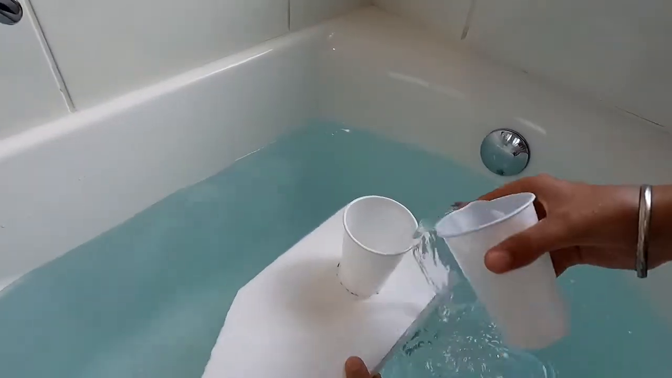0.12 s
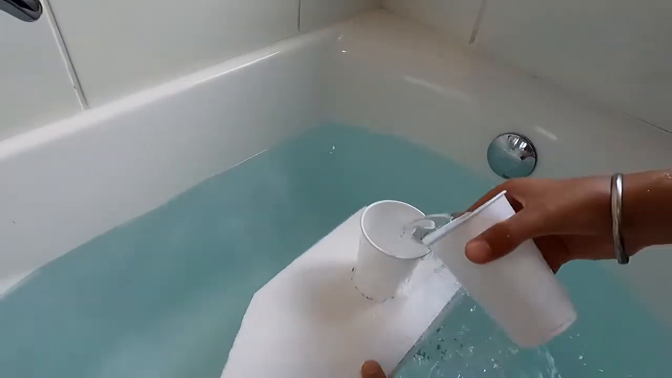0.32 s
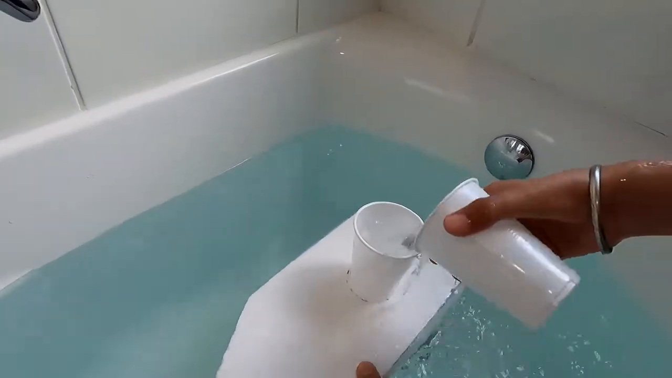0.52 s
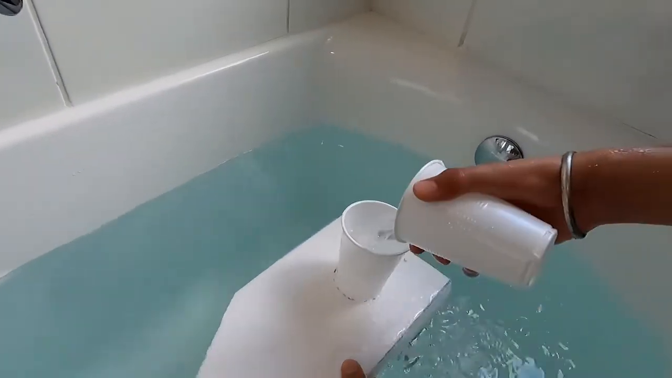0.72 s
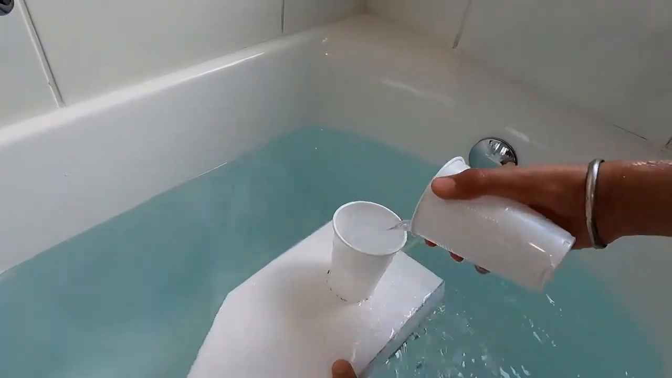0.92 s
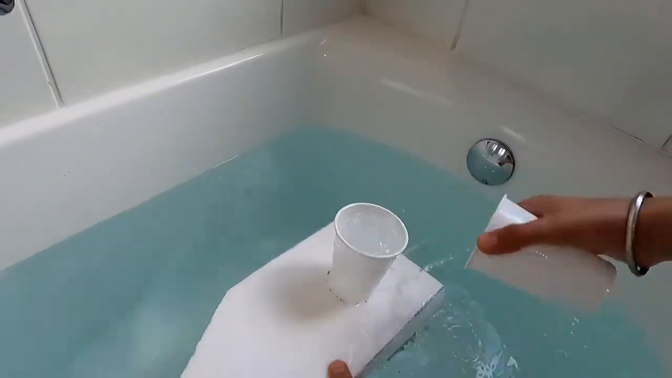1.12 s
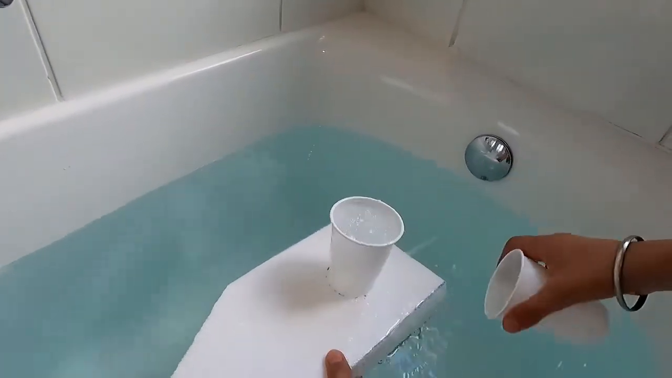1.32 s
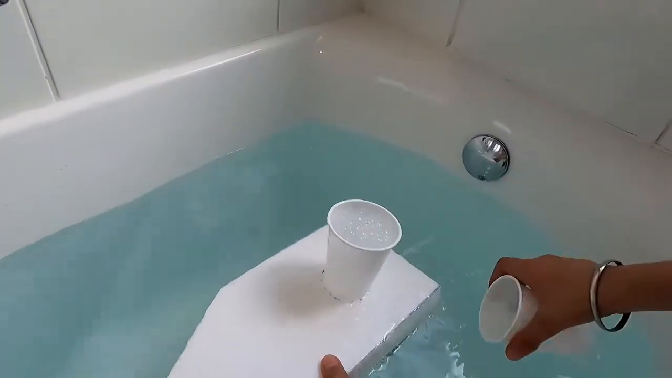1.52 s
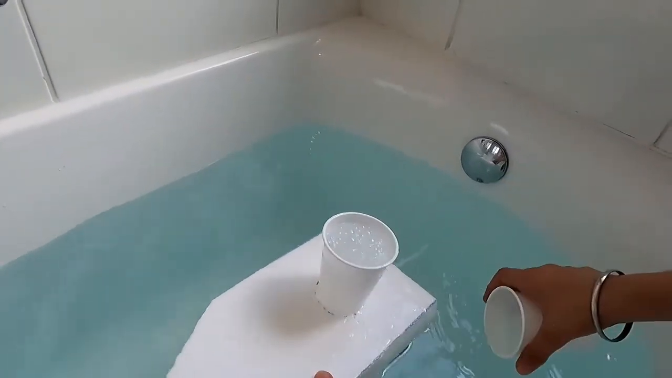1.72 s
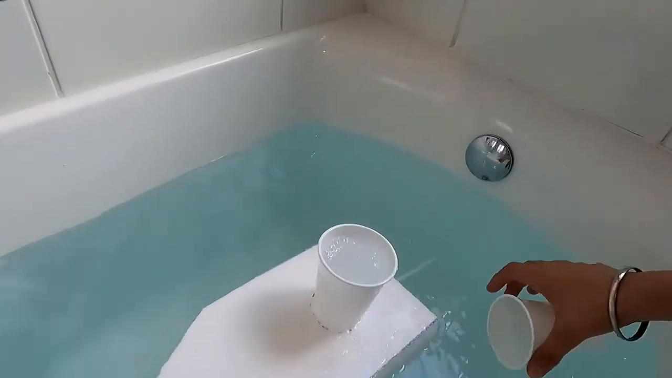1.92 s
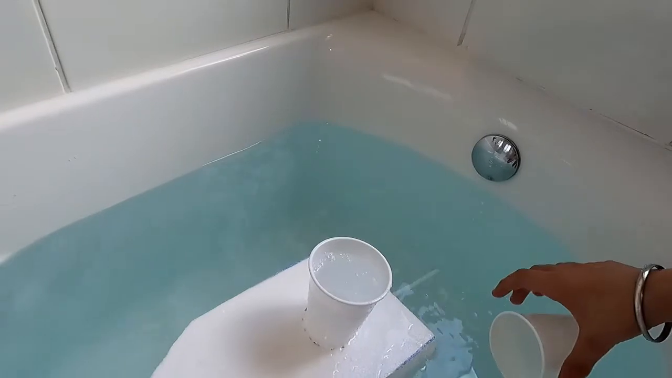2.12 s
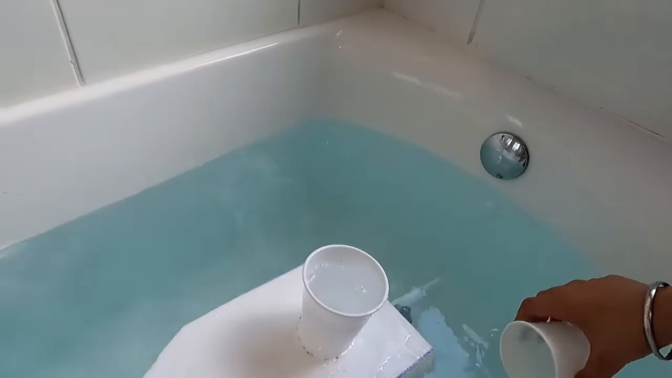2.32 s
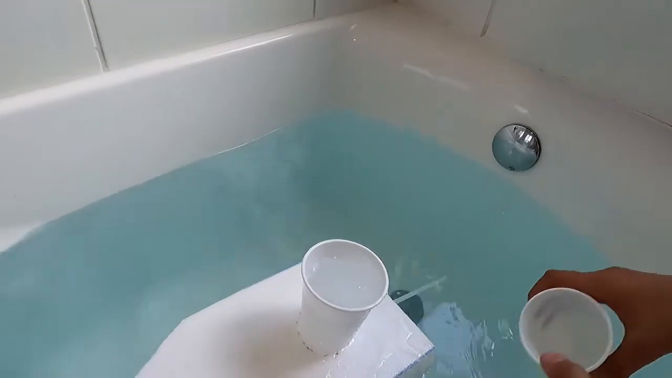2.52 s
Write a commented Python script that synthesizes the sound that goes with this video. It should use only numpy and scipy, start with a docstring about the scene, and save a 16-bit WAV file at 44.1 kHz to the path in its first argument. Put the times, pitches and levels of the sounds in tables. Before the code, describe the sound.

Short splashy water pour with bright plinks and a rising gurgle, fading to drips in a bathroom

```python
"""In a tiled bathroom, water is tipped from a plastic cup into a second cup that floats in a bathtub,
and spills over into the bath. The pour starts with a loud plink, gurgles upward as the cup fills,
then thins to drips and soft lapping. Ringing bubbles make the plinks and the gurgle; shaped noise adds
wash and hiss. The tub walls answer at once and the room rings on."""
import sys
import numpy as np
from scipy import signal
from scipy.fft import rfft, irfft, next_fast_len
from scipy.io import wavfile
from scipy.ndimage import map_coordinates

SR = 44100
rng = np.random.default_rng(int(sys.argv[2]) if len(sys.argv) > 2 else 0)


def wav_out(sig):
    """Save sig, one row per channel (or a flat mono array), as 16-bit PCM at SR to the path in sys.argv[1]."""
    wavfile.write(sys.argv[1], SR, np.round(np.clip(np.atleast_2d(sig).T, -1, 1) * 32767).astype(np.int16))


N = 114660  # length in samples (2.6 s)
TOP_HZ = 15900  # nothing sounds above this


def amp(db):
    """Turn decibels into a gain."""
    return 10 ** (np.asarray(db) / 20)


def unit(x):
    """Scale to an average (rms) strength of 1."""
    return x / np.sqrt(np.mean(x ** 2) + 1e-20)


def along(points, hz):
    """Read a curve of (Hz, value) points, with pitch on a log axis."""
    f, v = np.transpose(points)
    return np.interp(np.log(hz + 1), np.log(f + 1), v)


def curves(rows):
    """Draw each column after the time as a curve with one value per sample."""
    s, *columns = np.transpose(rows)
    return [np.interp(np.arange(N) / SR, s, column) for column in columns]


def filtered(x, response):
    """Strengthen or weaken each frequency of x by a response."""
    m = next_fast_len(N + SR // 2)
    return irfft(rfft(x, m) * response(np.fft.rfftfreq(m, 1 / SR)), m)[..., :N]


def coloured(x, colour):
    """Filter x by a colour curve, then scale to rms 1."""
    return unit(filtered(x, lambda hz: amp(along(colour, hz))))


def noise(alike, size=N):
    """Stereo white noise; alike is the likeness of left and right, 1 for the same."""
    a, b = rng.standard_normal((2, size))
    u = np.arccos(np.clip(alike, -1, 1)) / 2
    left = np.cos(u) * a + np.sin(u) * b
    right = np.cos(u) * a - np.sin(u) * b
    return np.array([left, right])


BAND_ALIKE = 0.55  # left-right likeness


def band(centre_hz, width):
    """Stereo noise in one resonance, at rms 1; width is a share of the centre pitch."""
    return unit(filtered(noise(BAND_ALIKE), lambda hz: 1 / (1 + ((hz / centre_hz - 1) / width) ** 2)))


def wobble(rate):
    """A smooth random curve through rate random points a second."""
    points = rng.standard_normal(int(N * rate / SR) + 4)
    return map_coordinates(points, [np.arange(N) * rate / SR])


def add(track, s, sound):
    """Mix a sound into a track at a time in seconds."""
    i = max(0, round(s * SR))
    part = track[..., i:i + sound.shape[-1]]
    part += sound[..., :part.shape[-1]]


SOFT_CYCLES = 0.87  # swell time of a bubble, in cycles


def ring(t, hz, life, rise):
    """A bubble: a dying sine whose pitch glides by the share rise in each life (life in seconds)."""
    glide = 1 + rise * np.minimum(t / life, 6) / 2
    swell = 1 - np.exp(-(t * hz / SOFT_CYCLES) ** 2)
    return np.sin(2 * np.pi * hz * t * glide) * np.exp(-t / life) * swell


SWARM_RISE = 0.031  # pitch rise per life
WIDTH, WIDE_ABOVE_HZ = 0.56, 300  # small bubbles scatter widely; the large ones stay near the middle


def swarm(rate, centre_hz, spread, cycles, scatter_db, size):
    """Random bubbles, rate a second, scattered in pitch, strength and direction; stereo, rms 1."""
    count = int(rate * N / SR)
    u = rng.random((count, 5))
    start = (u[:, 0] * N).astype(int)
    pitch_scatter = np.exp(spread * np.log(u[:, 1] / (1 - u[:, 1])) / 2)
    hz = np.broadcast_to(centre_hz, N)[start] * pitch_scatter
    hz = np.clip(hz, 100, TOP_HZ)[:, None]
    life = cycles * (.5 + u[:, 2:3]) / hz  # half to one and a half times the given cycles
    waves = ring(np.arange(size) / SR, hz, life, SWARM_RISE)
    waves = waves * amp(scatter_db * np.minimum(-np.log(u[:, 3:4]), np.e))
    pan = WIDTH * hz / np.hypot(hz, WIDE_ABOVE_HZ) * (2 * u[:, 4:] - 1)
    at = (start[:, None] + np.arange(size)).ravel()
    sides = [np.bincount(at, (waves * (1 + side * pan)).ravel(), N)[:N] for side in (1, -1)]
    return unit(np.array(sides))


def plink(t, hz, life, rise):
    """One bubble's ring; it radiates next to nothing far below its pitch."""
    highpass = signal.butter(3, hz / 2, "highpass", fs=SR, output="sos")
    return signal.sosfilt(highpass, ring(t, hz, life, rise))


def spattered(sound, level_db, life):
    """A sound followed by a dying cluster of weak random repeats."""
    t = np.arange(SR // 30) / SR
    fade = np.exp(-t / life) * (1 - np.exp(-t * 10 / life))
    hits = amp(level_db) * rng.standard_normal(len(t)) * fade
    return np.pad(sound, (0, len(t) - 1)) + signal.fftconvolve(sound, hits)


# Single air bubbles that ring as drops and the stream plunge in. Each row: start in seconds,
# starting pitch in Hz, level in dB, life in cycles, pitch rise per life as a share.
PLUNGE_BUBBLES = [(.1155, 1704, -32, 13, 0.018), (.1170, 1651, -46.5, 260, -0.0097),
                  (0.2261, 1954, -4.5, 7.6, 0.069), (.2385, 1163, -22, 8.2, -0.055),
                  (.2690, 828, -30, 11, -0.034), (.3600, 1048, -22.5, 3.8, -0.046),
                  (0.363, 244, -41, 4, 0.016), (0.387, 473, -40.5, 3.2, 0.024),
                  (.3830, 1036, -26, 9.2, -0.011), (.4640, 1710, -20, 10.5, -0.048),
                  (.4660, 1047, -30, 21, -0.0035), (.4760, 336, -40, 5.7, .03), (0.483, 251, -42, 5.7, .03),
                  (.5480, 1306, -26, 22, 0.0052), (.5640, 1460, -22, 4, 0), (.5830, 1235, -22, 29, 0.0174),
                  (.6040, 1294, -24, 9.9, 0.018), (.6115, 2830, -15, 2, -0.018),
                  (.6450, 2170, -22, 10, .02), (.6503, 1244, -15.5, 5, -0.004),
                  (.6553, 1384, -8.5, 2.8, -0.005), (.6930, 1327, -22, 9.6, 0.012),
                  (.7033, 2300, -16, 3.2, 0.06), (.7100, 1450, -23, 2.4, 0.058),
                  (.7290, 1308, -20, 14.6, -0.029), (.7500, 1653, -21, 11.8, 0.0076),
                  (.7680, 1610, -32, 8, 0.033), (.7850, 1350, -26.5, 9.5, -0.0034),
                  (.9650, 883, -26, 3.2, 0.025), (.9680, 434, -46.5, 5.8, 0.054),
                  (.9700, 4200, -22, 11.4, 0.022), (1.0800, 1300, -28, 5.5, 0.0014),
                  (1.1100, 2370, -30, 11, 0), (1.1460, 855, -29, 1.9, 0.037),
                  (1.1550, 390, -31.5, 2.2, -0.0036), (1.1612, 2420, -20.5, 3.9, 0.055),
                  (1.2580, 1970, -21, 2.4, 0.033), (1.4264, 1920, -9, 2.18, 0.019),
                  (1.4285, 2668, -18.5, 4.9, 0.014), (1.4439, 2230, -11.5, 2.4, 0.0071),
                  (1.5455, 1185, -29.5, 2.2, 0.016), (1.6200, 888, -42, 5.5, 0.028),
                  (1.7738, 1840, -24, 2.7, 0.014), (1.8320, 4820, -48.5, 37, 0.014),
                  (1.8720, 4240, -43.5, 15, -0.034), (2.2950, 2370, -55, 9, .02),
                  (2.3560, 1086, -44, 2.8, .02), (2.3580, 560, -52, 3, 0.013)]
# Sharp ticks of drops hitting water and plastic. Each row: start in seconds, pitch in Hz, level in dB.
DROP_TICKS = [(0.1337, 3870, -19.5), (0.1547, 4320, -24), (0.19, 4500, -20.5), (.2079, 5100, -14.5),
              (0.211, 3550, -25), (0.215, 5340, -17), (.218, 6100, -23.5), (0.225, 3320, -5),
              (0.2909, 4670, -11), (.2965, 6200, -27), (.3324, 4750, -27), (.3635, 7060, -26),
              (0.3771, 5000, -16.5), (.385, 4770, -15), (0.3976, 4020, -11.5), (0.4024, 5300, -17.5),
              (0.461, 6800, -25), (0.4912, 3560, -8), (0.5464, 5720, -15), (.5660, 3960, -13.5),
              (0.587, 5400, -21), (0.598, 7900, -22), (0.6496, 4870, -19), (0.6683, 3280, -10),
              (0.7033, 3280, -19), (0.7287, 4000, -17), (0.7330, 4730, -14.5), (.85, 3240, -18.5),
              (0.8952, 3800, -18.5), (0.9657, 3270, -13.5), (0.971, 3660, -19), (0.9957, 4300, -27),
              (1.0110, 3430, -18.5), (1.0677, 6940, -25), (1.1611, 4800, -19), (1.1785, 3470, -30),
              (1.215, 3340, -26), (1.2578, 2535, -22), (1.33, 4570, -20.5), (1.3857, 3060, -19),
              (1.3875, 4260, -22), (1.5357, 8670, -30), (1.5460, 3100, -18.5), (1.774, 8140, -42),
              (1.7905, 5000, -24), (1.8182, 3930, -37), (1.8974, 4030, -35), (1.953, 4760, -25),
              (1.9950, 5000, -37.5), (2.3570, 5980, -44), (2.4308, 7720, -42.5)]
# Bright snaps where a drop strikes flat. Each row: start in seconds, level in dB.
FLAT_SNAPS = [(0.1341, -37.5), (0.156, -37.5), (.2470, -32), (0.4627, -31), (0.492, -28), (0.5483, -32),
              (0.7299, -26.5), (1.0653, -48), (1.1000, -38), (1.444, -42.5), (1.5351, -42.5), (1.5460, -43),
              (1.7743, -38.5), (1.7928, -47.5), (1.9521, -47.5)]
# The tone of a snap. Each row: frequency in Hz, gain in dB.
SNAP_COLOUR = [(400, -50), (1500, -22), (3000, 3.5), (6000, 8.5), (9000, 1.5), (12000, -7), (15500, -22.5)]
SPLASH_DB, SPLASH_S = -24.5, 0.0068  # splash that roughens a one-cycle bubble (less on longer ones); its life
TICK_LIFE_S, TICK_RISE = 0.00052, 0.021  # ring of a tick; pitch rise per life
SPATTER_DB, SPATTER_S = -20.5, 0.0042  # fine droplets thrown up after a tick; their life
SNAP_S = 0.0027  # life of a snap


def drops():
    """Large bubbles plink with a splash, hard drops tick and spatter, and the flattest hits snap."""
    out, snaps, t = np.zeros(N), np.zeros((2, N)), np.arange(SR // 8) / SR
    for s, hz, db, cycles, rise in PLUNGE_BUBBLES:
        bubble = plink(t, hz, cycles / hz, rise)
        add(out, s, amp(db) * spattered(bubble, SPLASH_DB - 10 * np.log10(cycles), SPLASH_S))
    for s, hz, db in DROP_TICKS:
        tick = plink(t, hz, TICK_LIFE_S, TICK_RISE)
        add(out, s, amp(db) * spattered(tick, SPATTER_DB, SPATTER_S))
    for s, db in FLAT_SNAPS:
        add(snaps, s, amp(db) * noise(0.74, size=len(t)) * np.exp(-t / SNAP_S))
    return out + filtered(snaps, lambda hz: amp(along(SNAP_COLOUR, hz)))


# The stream in the cup. Each row: time in seconds, level of the bubbles in dB, pitch of the gurgle in Hz.
CUP_STREAM = [(.22, -86, 957), (.27, -42.5, 980), (.47, -43.5, 1072), (.53, -37, 1324), (.60, -42, 1284),
              (.77, -42.5, 1354), (.83, -50, 1442), (1.1, -57, 1422), (1.3, -99, 1410)]
GURGLE_RATE, GURGLE_CYCLES, GURGLE_WIDTH = 170, 6, 0.138  # bubbles a second; typical life; pitch spread
CUP_AIR_DB, CUP_AIR_RATE = -10, 42  # level of the air's note against the bubbles; how fast it wavers (per s)


def gurgle():
    """The bubbles and the air in the cup sound higher as it fills."""
    level_db, pitch_hz = curves(CUP_STREAM)
    phase = 2 * np.pi * np.cumsum(pitch_hz) / SR
    air = unit(wobble(CUP_AIR_RATE) * np.sin(phase) + wobble(CUP_AIR_RATE) * np.cos(phase))
    bubbles = swarm(GURGLE_RATE, pitch_hz, GURGLE_WIDTH, GURGLE_CYCLES, scatter_db=3.0, size=1600)
    return amp(level_db) * (bubbles + amp(CUP_AIR_DB) * air)


# Water spilling into the bath. Each row: time in seconds, level of the bubbles in dB.
SPILL_LEVEL = [(.22, -90), (.33, -62), (.37, -35), (.52, -42.5), (.66, -37.5), (.77, -34.5), (.82, -43),
               (.90, -40.5), (.95, -50), (.97, -41), (1.05, -47.5), (1.15, -45.5), (1.22, -58.5),
               (1.45, -68.5), (1.8, -64), (2.1, -87), (2.29, -73.5), (2.6, -79)]
# The tone of the spill. Each row: frequency in Hz, relative gain in dB.
SPILL_TONE = [(100, -32.5), (170, -14), (250, -9.5), (310, -18), (380, -6), (550, -15), (740, 0.5),
              (900, -8), (1400, -0.5), (1900, 1.5), (2500, 4), (4000, -9.5), (9000, -45)]
SPILL_WASH_DB = -7.5  # smooth wash against the bubbles


def spill(surge_db):
    """The overflow churns bubbles of all sizes into the bath."""
    level_db, = curves(SPILL_LEVEL)
    bubbles = swarm(1500, 1396, spread=.85, cycles=3.07, scatter_db=2.5, size=1200)
    wash = amp(SPILL_WASH_DB) * coloured(noise(1.0), SPILL_TONE)
    return amp(level_db + surge_db) * (coloured(bubbles, SPILL_TONE) + wash)


# The tone of the spray. Each row: frequency in Hz, relative gain in dB.
SPRAY_TONE = [(600, -31.5), (1800, -4.5), (3000, -5), (4300, -2.5), (6000, -5), (8000, -8), (10000, -19),
              (12500, -19.5), (15500, -34)]
# Fine spray and bursting foam, also followed by the pops. Each row: time in seconds, level in dB.
SPRAY_LEVEL = [(0, -53.5), (.11, -59.5), (.2, -47.5), (.25, -36.5), (.40, -37.5), (.52, -42.5), (.58, -38),
               (.74, -38.5), (.81, -47.5), (.95, -48), (1.0, -44), (1.05, -47.5), (1.09, -41),
               (1.14, -52.5), (1.25, -49), (1.4, -51.5), (1.48, -55), (1.7, -56.5), (1.87, -62),
               (2.15, -82.5), (2.3, -71.5), (2.38, -63.5), (2.6, -87)]
CLUMP_DB, CLUMP_RATE = 1.6, 160  # droplets land in clumps: depth; random points per second
PING_DB, SPRAY_HISS_DB = -3, -7.5  # pings against crackle; hiss against both


def spray(surge_db):
    """Tiny droplets crackle in clumps and tiny bubbles ping over a soft hiss."""
    level_db, = curves(SPRAY_LEVEL)
    droplets = swarm(1300, 5970, spread=.6, cycles=0.92, scatter_db=4.8, size=300)
    pings = swarm(420, 3800, spread=0.575, cycles=3.5, scatter_db=2.0, size=600)
    clumps = amp(CLUMP_DB * wobble(CLUMP_RATE))
    grains = unit(clumps * (droplets + amp(PING_DB) * pings))
    hiss = amp(SPRAY_HISS_DB) * coloured(noise(0.15), SPRAY_TONE)
    return amp(level_db + surge_db) * (coloured(grains, SPRAY_TONE) + hiss)


# The tone of the pops. Each row: frequency in Hz, relative gain in dB.
POP_TONE = [(1000, -42.5), (3000, -9), (5500, 1), (9000, -5.5), (12500, -1), (15500, -15.5)]
POP_DB, POP_FLOOR_DB = -13, -76  # level against the spray; steady level of the foam left on the bath


def pops():
    """Single tiny bubbles burst with needle-sharp pops, and go on after the pour."""
    level_db, = curves(SPRAY_LEVEL)
    grains = swarm(200, 7570, spread=0.41, cycles=1.05, scatter_db=5.0, size=200)
    return (amp(level_db + POP_DB) + amp(POP_FLOOR_DB)) * coloured(grains, POP_TONE)


# Ripples that slap under the float. Each row: start in seconds, pitch in Hz, level in dB.
RIPPLES = [(0.23, 71, -41), (1.653, 70.5, -39.5), (2.322, 199.6, -49.5), (2.356, 234.6, -40),
           (2.383, 150, -45), (2.428, 254, -48), (2.447, 274, -50), (2.458, 62, -52), (2.551, 52.5, -38),
           (2.581, 55, -38.5)]
LAP_LIFE_S, SLOSH_S = 0.0149, 0.031  # life of the low ring; life of the slosh
SLOSH_DB, SLOSH_HZ = -18.5, 1130  # the wet upper part of the slosh
THUD_DB, THUD_HZ = -5.5, 181.5  # the low part of the slosh


def lapping():
    """Each ripple gives a low thud; the higher its pitch, the more it sloshes."""
    out, wet, t = np.zeros(N), np.zeros(N), np.arange(SR // 4) / SR
    for s, hz, db in RIPPLES:
        add(out, s, amp(db) * ring(t, hz, LAP_LIFE_S, 0))
        add(wet, s, amp(db) * hz / (hz + 200) * np.exp(-t / SLOSH_S))
    slosh = amp(SLOSH_DB) * band(SLOSH_HZ, width=0.53)
    thud = amp(THUD_DB) * band(THUD_HZ, width=0.47)
    return out + wet * (slosh + thud)


# Nearby tub walls. Each row: echo delay in seconds, gain on the left, gain on the right.
TUB_WALLS = [(.00205, 0.3, 0.37), (.0035, 0.13, 0.08), (.0056, 0.11, 0.17), (.0083, 0.18, 0.06)]


def tub(x):
    """Add the quick echoes of the tub walls, each a delayed, weaker copy."""
    out = x.copy()
    for s, left, right in TUB_WALLS:
        echo = filtered(x, lambda hz: np.exp(-2j * np.pi * hz * s))
        out += echo * np.array([[left], [right]])
    return out


# How long the room rings. Each row: frequency in Hz, time in seconds to die away by 60 dB.
ROOM_RING = [(100, 1), (500, .75), (1300, 0.89), (2000, 0.75), (3000, 0.69), (5000, 0.61), (12000, 0.35)]
TAIL_ALIKE = .68  # left-right likeness of the room's tail
ROOM_BUILD_S, ROOM_SHIFT_S = 0.007, 0.298  # the tail builds up; seconds from one random tail pattern to the next


def room(x):
    """The tiled room's tail: each frequency dies at its own speed; random tail patterns crossfade."""
    out, knots = np.zeros((2, N)), np.arange(N) / SR / ROOM_SHIFT_S
    for k in range(int(knots[-1]) + 2):
        hz, t, z = signal.stft(noise(TAIL_ALIKE, size=SR), SR, nperseg=256)
        decay = amp(-60 * t / along(ROOM_RING, hz)[:, None])
        tail = signal.istft(z * decay, SR, nperseg=256)[1]
        tail = tail * (1 - np.exp(-np.arange(tail.shape[1]) / SR / ROOM_BUILD_S))
        share = np.sin(np.pi / 2 * np.maximum(0, 1 - abs(knots - k)))  # fade from one pattern to the next
        out += signal.fftconvolve(x * share, tail / np.linalg.norm(tail[0]), axes=1)[:, :N]
    return out


EARLIER_HZ, EARLIER_DB, EARLIER_T60 = 1980, -52, 0.59  # pitch; starting level; seconds to fall 60 dB


def earlier_drip():
    """The room still rings from an earlier drip: a narrow band of noise dying away."""
    fade = amp(EARLIER_DB - 60 * np.arange(N) / SR / EARLIER_T60)
    return fade * band(EARLIER_HZ, width=0.083)


# The tone of the quiet background. Each row: frequency in Hz, relative gain in dB.
BACKGROUND_TONE = [(25, -3), (45, -8), (70, 0), (110, -11), (175, 3.5), (280, -7.5), (500, -14.5),
                   (800, -20), (1200, -12), (2000, -34.5), (3500, -32), (7000, -19.5), (12000, -43.5),
                   (15500, -54.5)]


def background():
    """A steady, quiet noise, mostly low, under everything."""
    return amp(-59) * coloured(noise(0.52), BACKGROUND_TONE)


SURGE_DB, SURGE_RATE = 1.5, 86  # the stream breaks into lumps: depth; random points per second
ROOM_DB = -7  # room tail against the water


def scene():
    """All the water in the tub and room, over a quiet background."""
    surge_db = SURGE_DB * wobble(SURGE_RATE)  # spill and spray surge together
    water = tub(gurgle() + spill(surge_db) + spray(surge_db) + pops() + drops() + lapping())
    return water + amp(ROOM_DB) * room(water) + earlier_drip() + background()


MIC_LAG_S = .000017  # the right port hears the sound first


def record(dry):
    """Two close microphone ports lift the treble near 12.5 kHz, dull the very top and cut at the band limit."""
    def response(hz):
        lag = np.exp(-1j * np.pi * hz * MIC_LAG_S * np.array([[1], [-1]]))
        tone = amp(along([(8000, 0.5), (12500, 4.0), (15500, -5)], hz))  # (Hz, dB)
        return lag * tone * (hz < TOP_HZ)
    return filtered(dry, response)


dry = scene()
out = record(dry)
wav_out(out)
```